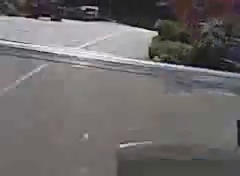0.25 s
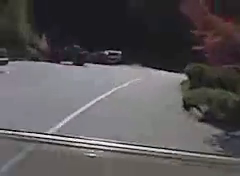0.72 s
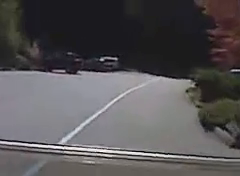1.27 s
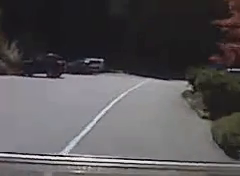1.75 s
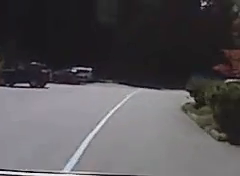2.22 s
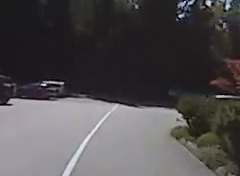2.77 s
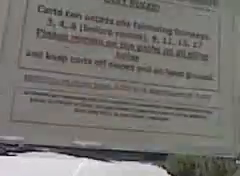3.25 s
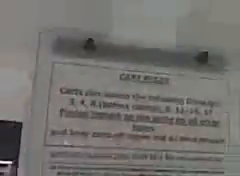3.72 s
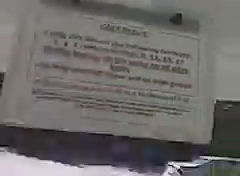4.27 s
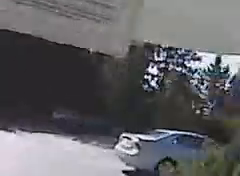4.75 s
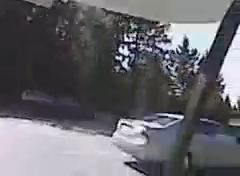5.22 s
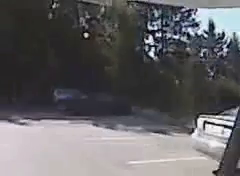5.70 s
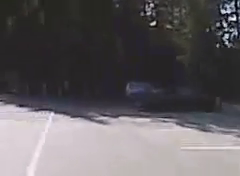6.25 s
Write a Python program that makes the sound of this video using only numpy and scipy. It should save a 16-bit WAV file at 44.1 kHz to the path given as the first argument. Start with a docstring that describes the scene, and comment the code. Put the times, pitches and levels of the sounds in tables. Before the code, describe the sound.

An electric cart drives at nearly constant speed across open pavement. Its gears sing a nasal, trembling single tone above soft tyre noise, with occasional light plastic ticks. The close onboard microphone then meets the air stream: clustered low-mid buffets, knocks and raspy bursts cover the whine, with the loudest crackling overload around four seconds. Later gusts are weaker and more scattered, and the whine stands out again. Band-limited, dry outdoor sound.

```python
"""The drive gears of an electric golf cart whine on one wavering note, heard from the seat.
The whine is a sine with three weak upper partials; shaped noise makes the tyre roar and hiss beneath it,
and loose fittings tick as struck resonances. After two seconds the microphone is lifted above the windscreen:
eddies of wind thud and rasp on it as noise swells, sharp pushes of air knock, and the strongest overload it."""
import sys
import numpy as np
from scipy import signal
from scipy.fft import rfft, irfft
from scipy.io import wavfile
from scipy.ndimage import uniform_filter1d

SR = 44100
rng = np.random.default_rng(int(sys.argv[2]) if len(sys.argv) > 2 else 0)


def generate_wav(sig):
    """Save sig (samples, or channels by samples) to the path in sys.argv[1] as 16-bit PCM at SR."""
    pcm = np.round(np.clip(np.atleast_2d(sig).T, -1, 1) * 32767).astype(np.int16)
    wavfile.write(sys.argv[1], SR, pcm)


N = 285768
TIME = np.arange(N) / SR


def from_db(db):
    """Decibels to gain."""
    return 10 ** (np.asarray(db) / 20)


def rms_one(x):
    """Scale to unit rms."""
    return x / np.sqrt(np.mean(x ** 2) + 1e-20)


def in_time(rows):
    """Turn each column after the time into a curve joined by straight lines."""
    seconds, *columns = np.transpose(rows)
    return [np.interp(TIME, seconds, column) for column in columns]


def drift(rate_hz):
    """Random wander of unit rms; its components are halved at rate_hz and fall away above it."""
    hz = np.arange(N // 2 + 1) * SR / N
    spectrum = rfft(rng.standard_normal(N)) / (1 + (hz / rate_hz) ** 2)
    return rms_one(irfft(spectrum, N))


def noise(colour):
    """Noise of unit rms with the given colour, silent above its last frequency."""
    hz, db = np.transpose(colour)
    bins = np.arange(1, N // 2 + 2) * SR / N
    gain = from_db(np.interp(np.log(bins), np.log(hz), db, right=-np.inf))
    return rms_one(irfft(rfft(rng.standard_normal(N)) * gain, N))


def evened(x, seconds):
    """Hold the short-term level of a signal near 1."""
    size = max(int(seconds * SR), 2)
    power = uniform_filter1d(uniform_filter1d(x ** 2, size), size)
    return x / np.sqrt(power + 1e-9)


# Rolling on the asphalt. Each row: time in seconds, roar level in dB before its patchiness.
ROAR_LEVEL = [(0, -42), (1.1, -43), (2.2, -42.5), (3.3, -42.5), (4.4, -46), (5.3, -43.5), (5.9, -48),
              (6.48, -46.5)]
# Colour of the tyre roar. Each row: frequency in Hz, relative density in dB.
ROAR_COLOUR = [(20, -45), (40, -24), (70, -18), (140, -17.5), (235, -6), (350, -5.5), (480, -4), (560, 5),
               (650, -2), (790, -3), (950, -10), (1250, -16), (2500, -36.5)]
# Colour of the tyre hiss. Each row: frequency in Hz, relative density in dB.
HISS_COLOUR = [(500, -14.5), (1000, -5.5), (1400, -0.5), (1530, -0.5), (1700, 0.5), (2000, -1), (2300, -1),
               (2600, 0), (3000, -1.5), (3350, -1), (3600, -10), (3900, -16.5), (4300, -23.5), (4700, -60)]


def tyres(hiss_db=-50, roar_patchy_db=1.5, hiss_patchy_db=2.3):
    """Tread on coarse asphalt: a low roar and a fine hiss, both slightly uneven."""
    roar_db, = in_time(ROAR_LEVEL)
    roar = from_db(roar_db + roar_patchy_db * drift(45)) * noise(ROAR_COLOUR)
    hiss = from_db(hiss_db + hiss_patchy_db * drift(36)) * noise(HISS_COLOUR)
    return roar + hiss


def ring(clicks, hz, t60):
    """A unit click starts a sine of about height 1 that dies by 60 dB in t60 seconds."""
    radius = from_db(-60 / (t60 * SR))
    angle = 2 * np.pi * hz / SR
    feedback = [1, -2 * radius * np.cos(angle), radius * radius]
    return signal.lfilter([0, np.sin(angle)], feedback, clicks + 1e-18)


# Ticks of the loose fittings. Each row: start in seconds, strength in dB before the overall trim.
TICK_TIMES = [(0.260, -24.5), (0.713, -32), (1.212, -32.5), (2.349, -29), (2.979, -25), (3.131, -30),
              (3.251, -27), (3.627, -29.5), (4.381, -31), (4.622, -30), (5.567, -31.5), (6.131, -30),
              (6.214, -29.5)]
# What the fittings ring with. Each row: frequency in Hz, relative strength in dB, 60 dB decay in seconds.
FITTING_RESONANCES = [(1400, 1.5, 0.027), (1890, -10, 0.053), (2250, -6, 0.011), (2606, 0.5, 0.03),
                      (2930, -5, 0.0073), (3184, -4, 0.029), (3328, -3, 0.015)]


def fittings(level_db=-12.5, fade_db=-5.0, chatter_s=0.0023, uneven_db=4.1):
    """Each loose part chatters in a quick run of fading touches, striking every mode with a new strength."""
    start, strength_db = np.transpose(TICK_TIMES)
    touch = np.arange(7)
    jitter = rng.uniform(-0.69, 0.5, (len(start), len(touch)))
    times = start[:, None] + chatter_s * (touch + jitter)
    at = np.clip((times * SR).astype(int), 0, N - 1)
    ringing = np.zeros(N)
    for hz, mode_db, t60 in FITTING_RESONANCES:
        touch_db = strength_db[:, None] + mode_db + fade_db * touch
        clicks = np.zeros(N)
        clicks[at] = from_db(touch_db + rng.normal(0, uneven_db, at.shape))
        # touches push either way at random
        ringing += ring(clicks * rng.choice([-1, 1], N), hz, t60)
    band = signal.butter(8, [900, 3600], "band", fs=SR, output="sos")
    return from_db(level_db) * signal.sosfilt(band, ringing)


# The air stream on the microphone, full of small eddies.
# Each row: time in seconds, base level of the thud in dB before its lumpiness.
FLUTTER_LEVEL = [(0, -72), (2.25, -61), (2.36, -35), (2.8, -37.5), (3.1, -40.5), (3.5, -46), (3.9, -36.5),
                 (4.7, -38.5), (4.88, -48), (5.17, -46), (5.4, -59.5), (5.75, -38.5), (6.25, -39),
                 (6.48, -43.5)]
# Gusts that hit the microphone. Each row: middle in seconds, level of thud and rasp together in dB before
# its lumpiness, length between half-power points in seconds, rasp relative to thud in dB.
GUSTS = [(2.301, -25, 0.012, -18), (2.479, -19.5, 0.027, -16), (2.503, -20.5, 0.0097, -29.5),
         (2.533, -19.5, .026, -15.5), (2.622, -13.5, .010, -2), (2.636, -13, 0.013, -14.5),
         (2.749, -19.5, 0.015, -9), (2.789, -16, 0.0051, -22), (2.909, -21.5, 0.03, -16),
         (2.972, -17.5, 0.028, -9.5), (3.235, -22, 0.008, -11), (3.254, -15.5, 0.0057, -11),
         (3.297, -23.5, 0.0077, -10), (3.666, -25.5, 0.0099, -27.5), (3.726, -24, 0.0083, -36),
         (3.805, -20.5, 0.017, -10.5), (3.829, -9, 0.014, -8), (3.85, -13, 0.0088, -21.5),
         (3.878, -17.5, 0.019, -15.5), (4.03, -15.5, 0.014, -8), (4.043, -10.5, 0.012, -3),
         (4.064, -13.5, 0.016, -6), (4.082, -3.5, 0.0049, -18), (4.093, -14.5, 0.017, -6),
         (4.249, -20, 0.012, -16.5), (4.276, -23, 0.016, -10), (4.317, -24.5, 0.005, -16),
         (4.478, -24, .015, -25), (4.593, -12, 0.017, -9), (4.621, -14, .014, -2),
         (4.684, -21.5, 0.01, -19), (4.941, -27, 0.0092, -20), (5.059, -33, 0.019, -18),
         (5.151, -29.5, 0.014, -22), (5.518, -31.5, 0.013, -20), (5.68, -27, 0.017, -16),
         (5.965, -25, 0.0082, -19), (6.07, -21.5, .028, -14), (6.28, -25, 0.014, -30)]
# Colour of the dull thud. Each row: frequency in Hz, relative density in dB.
THUD_COLOUR = [(20, -40), (60, -25), (100, -22.5), (140, -25.5), (180, -13.5), (235, 2), (290, 4),
               (370, -1.5), (480, -1), (620, -9), (800, -18.5), (1200, -35.5), (3000, -73)]
# Colour of the rasp. Each row: frequency in Hz, relative density in dB.
RASP_COLOUR = [(300, -28.5), (550, -1), (750, 5.5), (1000, -2.5), (1450, -14), (1900, -22.5), (2600, -28),
               (3400, -38), (4300, -52.5)]


def wind(lumpy_db=7.0, gust_lumpy_db=1.0, flutter_rasp_db=-20.0, edge=2.65):
    """Small eddies flutter at random; gusts swell and die as a dull thud, raspier when they hit squarely."""
    flutter_db, = in_time(FLUTTER_LEVEL)
    thud_power = from_db(flutter_db + lumpy_db * np.minimum(drift(45), 1.7)) ** 2
    rasp_power = thud_power * from_db(flutter_rasp_db) ** 2
    lumps = evened(from_db(gust_lumpy_db * drift(65)), seconds=0.02) ** 2
    for middle, db, length, rasp_db in GUSTS:
        first = max(int((middle - 2 * length) * SR), 0)
        near = slice(first, int((middle + 2 * length) * SR))
        # a higher edge gives a flatter top and steeper flanks
        distance = np.abs(2 * (TIME[near] - middle) / length)
        swell = from_db(db) ** 2 * lumps[near] * 0.5 ** (distance ** edge)
        # share the power of the gust between thud and rasp
        thud_power[near] += swell / (1 + from_db(rasp_db) ** 2)
        rasp_power[near] += swell / (1 + from_db(-rasp_db) ** 2)
    thud = np.sqrt(thud_power) * evened(noise(THUD_COLOUR), seconds=0.01)
    rasp = np.sqrt(rasp_power) * evened(noise(RASP_COLOUR), seconds=0.0056)
    return thud + rasp


def pressure_pulse(start, db, corner_hz):
    """A sudden push of air, rounded off steeply above its corner, with its peak height given by db."""
    rounding = signal.butter(5, corner_hz, fs=SR, output="sos")
    push = signal.sosfilt(rounding, signal.unit_impulse(SR // 50))
    push = from_db(db) * push / push.max()
    return np.interp(TIME - start, np.arange(len(push)) / SR, push, left=0, right=0)


# Single sharp pushes of air on the microphone.
# Each row: start in seconds, peak in dB before the microphone shapes it, corner frequency in Hz.
AIR_PUSHES = [(2.341, -24, 1500), (2.6201, -7, 1600), (2.7195, -18.5, 1086), (2.8138, -20, 1220),
              (2.8758, -12, 1360), (2.9235, -18, 1200), (2.9815, -14, 980), (3.251, -8, 1240),
              (3.8295, -4.5, 1026), (4.044, -7.5, 1340), (4.0762, 0, 1360), (4.0808, -7.5, 980),
              (5.116, -20, 510), (5.682, -22, 870)]


def knocks(low_cut_hz=220.0, body_hz=510.0, body_db=-0.5, direct_db=-4.0):
    """The microphone's bass cut and its low-mid emphasis turn each push of air into a short swing."""
    pushes = sum(pressure_pulse(*row) for row in AIR_PUSHES) + 1e-18
    low_mids = signal.butter(1, [body_hz / 2, body_hz * 2], "band", fs=SR, output="sos")
    body = signal.sosfilt(low_mids, pushes)
    low_cut = signal.butter(4, low_cut_hz, "high", fs=SR, output="sos")
    return signal.sosfilt(low_cut, from_db(direct_db) * pushes + from_db(body_db) * body)


def sway(turns, rows):
    """A swing that repeats with every turn of the wheels."""
    return sum(swing * np.cos(2 * np.pi * k * (turns - crest)) for k, swing, crest in rows)


PINION_TEETH = 17
AXLE_RATIO = 12.5  # pinion turns per wheel turn
# Speed of the drive. Each row: time in seconds, gear mesh rate in Hz before sway and road shake.
DRIVE_SPEED = [(0.0, 565.0), (0.12, 568.6), (2.04, 559.6), (2.64, 562.0), (3.24, 559.4), (3.36, 567.5),
               (3.6, 561.4), (3.72, 563.2), (4.08, 560.1), (6.12, 563.8), (6.24, 559.6), (6.48, 561.0)]
# Slightly oval wheels sway the speed.
# Each row: times per wheel turn, swing of the mesh rate in Hz, place of the crest in wheel turns.
WHEEL_SPEED_SWAY = [(1, 2.7, .37), (2, 2.0, .39)]
# They sway the load on the gears too.
# Each row: times per wheel turn, swing in dB, place of the crest in wheel turns.
WHEEL_LOAD_SWAY = [(1, 1.5, .93), (2, 1.0, .36), (4, .9, .08)]
# Loudness of the whine as the microphone is moved about.
# Each row: time in seconds, base level of the main note in dB (sine amplitude) before load and throb.
WHINE_LEVEL = [(0.0, -25.5), (0.96, -26), (1.2, -27.5), (1.32, -23), (1.56, -28), (1.68, -22),
               (1.92, -28.5), (2.04, -24.5), (2.4, -24.5), (3.12, -29.5), (3.24, -25.5), (3.96, -34),
               (4.32, -28.5), (5.16, -30), (5.4, -25), (5.52, -27), (5.88, -22.5), (6.48, -29.5)]
# Upper partials of the whine. Each row: multiple of the mesh rate, base level relative to the main note in dB.
UPPER_PARTIALS = [(2, -29.5), (2.49, -39), (3.345, -35)]


def gear_whine(road_db=1.0, road_hz=0.9, shaft_swing=0.09, shaft_throb=0.089, rough=0.1, jitter=0.087):
    """Meshing teeth sing one note; wheels, pinion run-out and road shake its level and phase (in radians)."""
    speed_hz, = in_time(DRIVE_SPEED)
    whine_db, = in_time(WHINE_LEVEL)
    wheel_turns = np.cumsum(speed_hz) / SR / (PINION_TEETH * AXLE_RATIO)
    mesh_hz = speed_hz + sway(wheel_turns, WHEEL_SPEED_SWAY) + road_hz * drift(6.6)
    load_db = sway(wheel_turns, WHEEL_LOAD_SWAY) + road_db * drift(6.6)
    mesh = 2 * np.pi * np.cumsum(mesh_hz) / SR
    shaft = mesh / PINION_TEETH + 0.5 * drift(1.9)
    # the teeth are loaded unevenly once and twice in each turn of the shaft
    uneven_load = np.sin(shaft) + 0.75 * np.sin(2 * shaft)
    throb = 1 + shaft_throb * uneven_load + rough * drift(62)
    run_out = np.cos(shaft) + 0.5 * np.sin(2 * shaft)
    phase = mesh + shaft_swing * run_out + jitter * drift(56)
    tone = np.sin(phase)
    # each partial wanders a little in level and phase by itself
    for multiple, db in UPPER_PARTIALS:
        tone = tone + from_db(db + 2 * drift(10)) * np.sin(multiple * phase + 0.5 * drift(17))
    return from_db(whine_db + load_db) * throb * tone


def scene():
    """All sources at the one microphone."""
    return (tyres() + fittings() + wind() + knocks() + gear_whine())[None, :]


def record(dry, band_hz=4100, overload=0.725, cutoff_hz=16000):
    """The microphone passes little above band_hz; the strongest buffets clip after it and spit treble."""
    narrow = signal.sosfilt(signal.butter(12, band_hz, fs=SR, output="sos"), dry)
    clipped = np.clip(narrow, -overload, overload)
    # the spat treble is 70 dB down from cutoff_hz upwards
    return signal.sosfilt(signal.cheby2(12, 70, cutoff_hz, fs=SR, output="sos"), clipped)


dry = scene()
out = record(dry)
generate_wav(out)
```